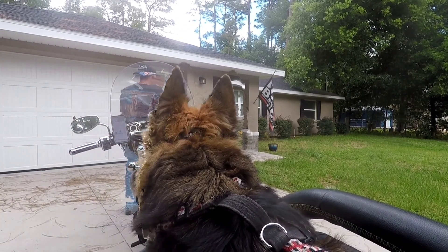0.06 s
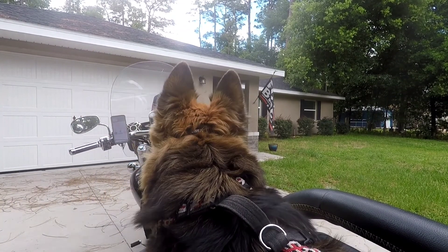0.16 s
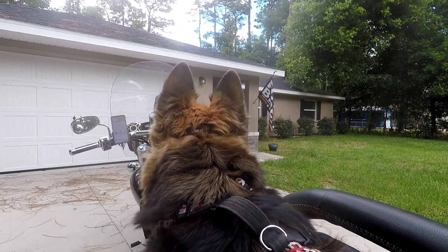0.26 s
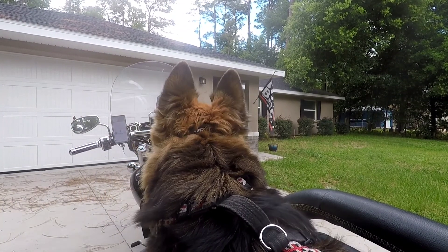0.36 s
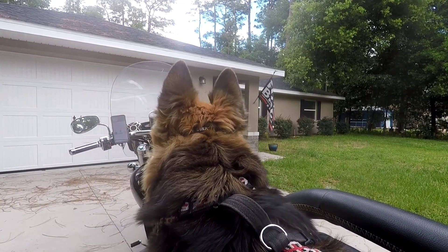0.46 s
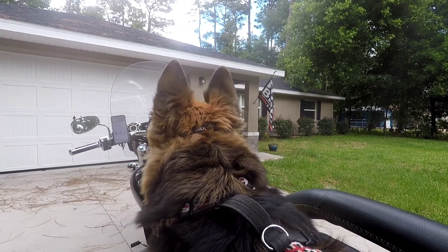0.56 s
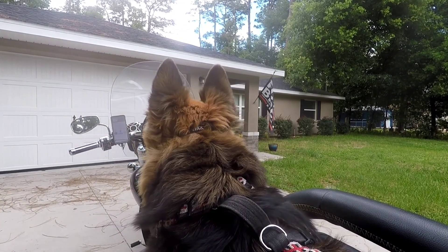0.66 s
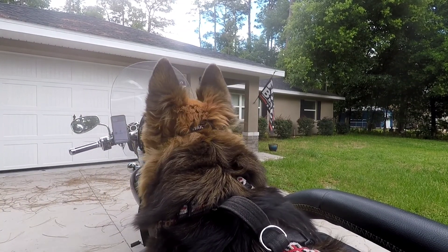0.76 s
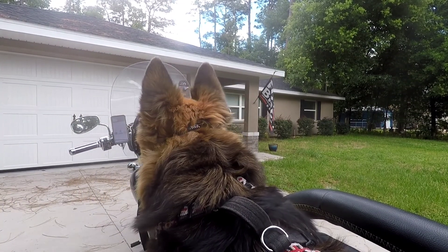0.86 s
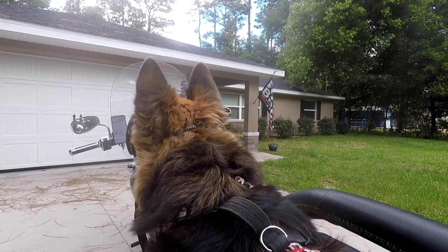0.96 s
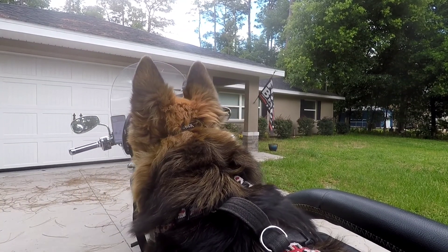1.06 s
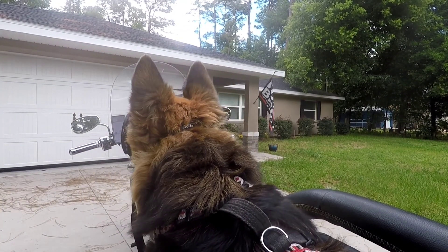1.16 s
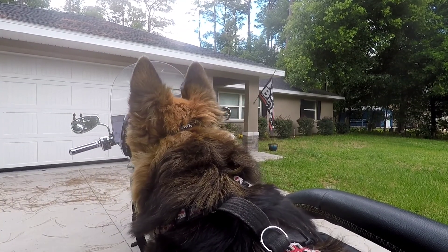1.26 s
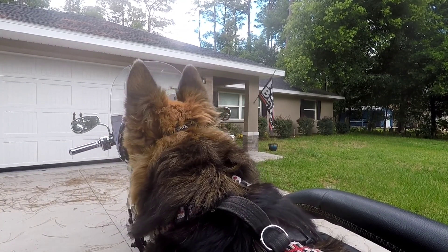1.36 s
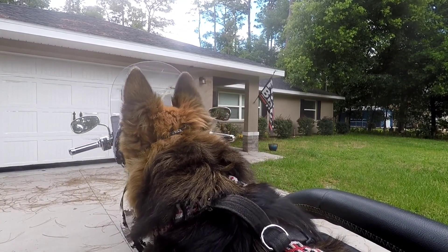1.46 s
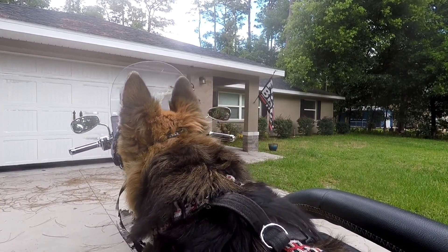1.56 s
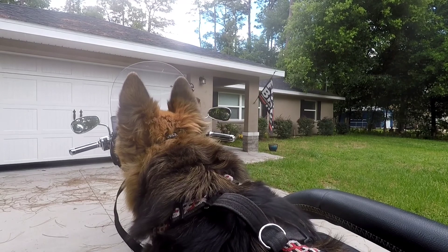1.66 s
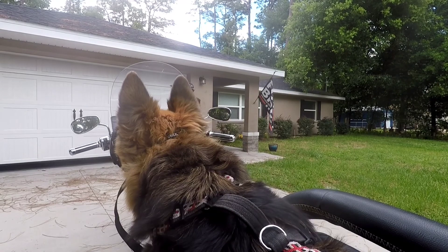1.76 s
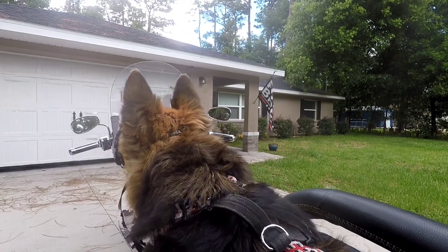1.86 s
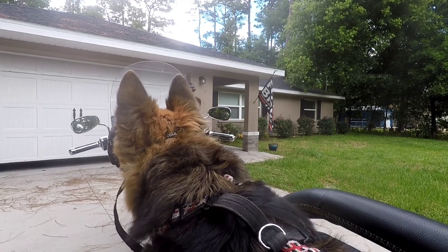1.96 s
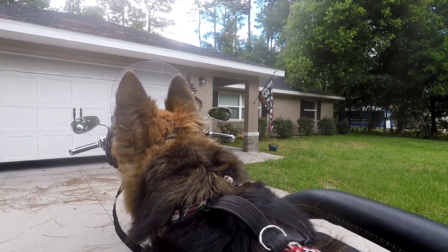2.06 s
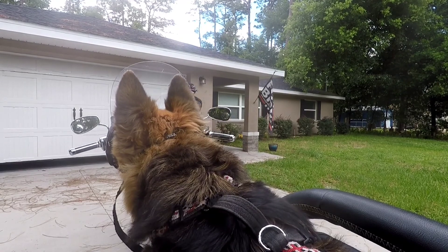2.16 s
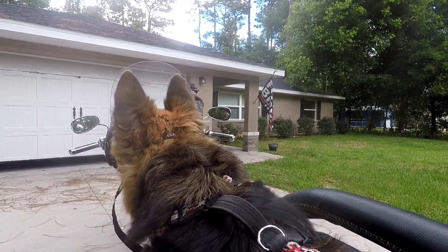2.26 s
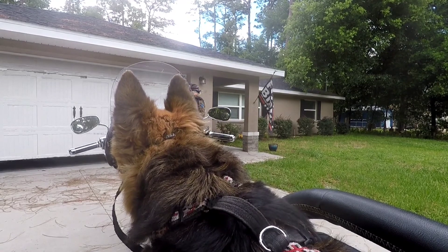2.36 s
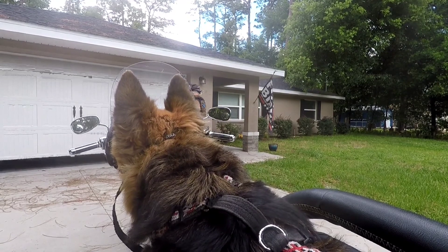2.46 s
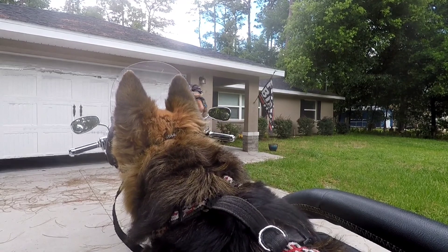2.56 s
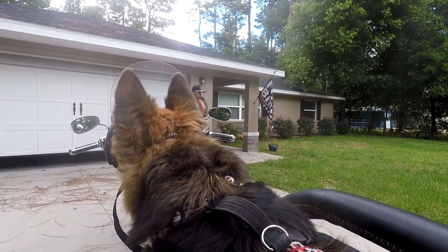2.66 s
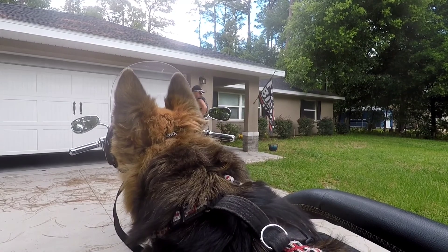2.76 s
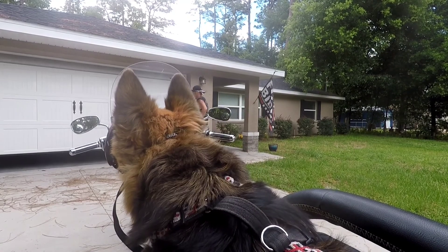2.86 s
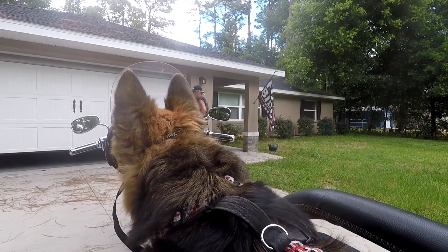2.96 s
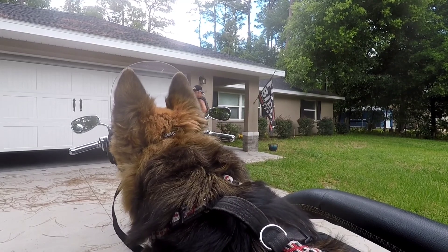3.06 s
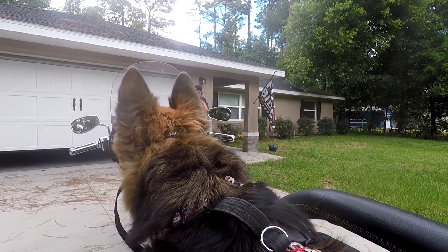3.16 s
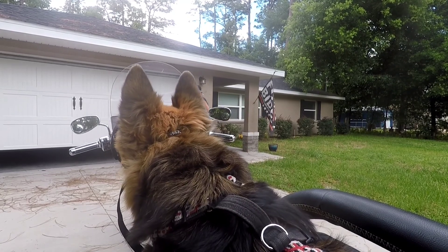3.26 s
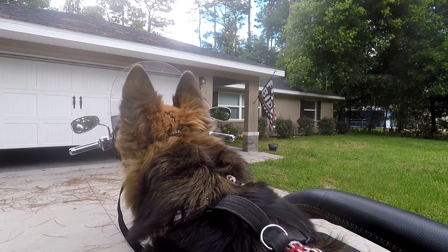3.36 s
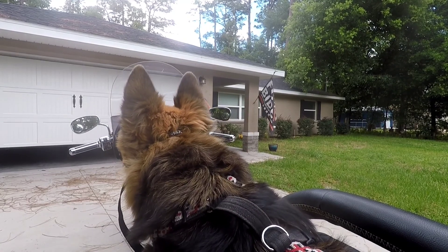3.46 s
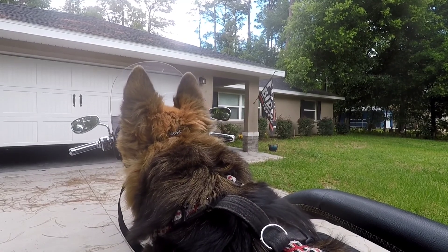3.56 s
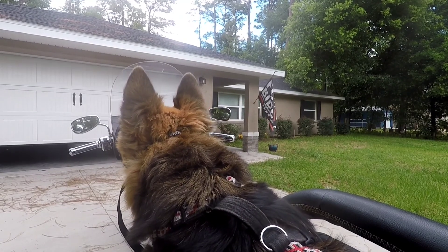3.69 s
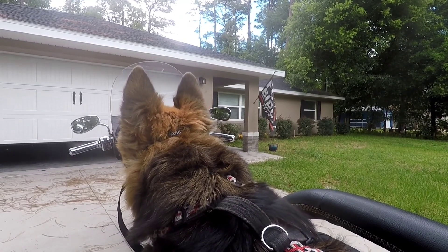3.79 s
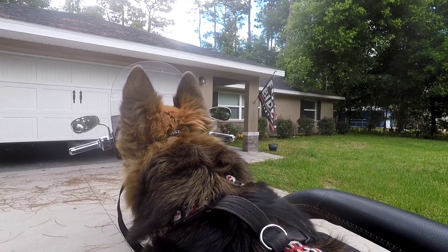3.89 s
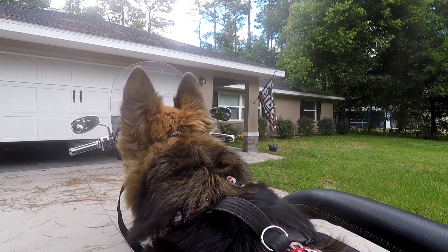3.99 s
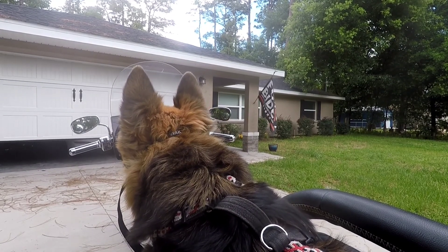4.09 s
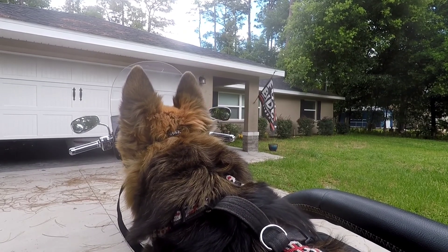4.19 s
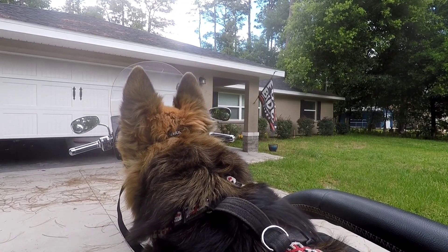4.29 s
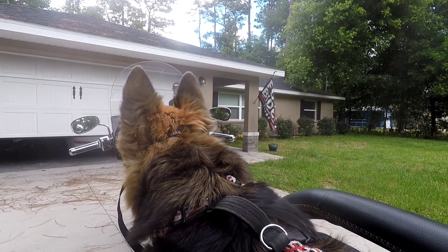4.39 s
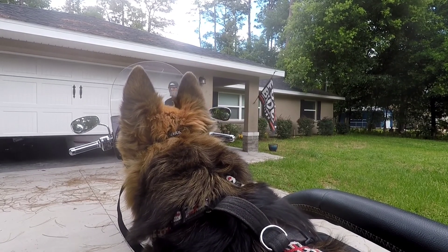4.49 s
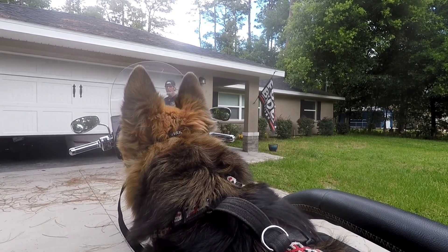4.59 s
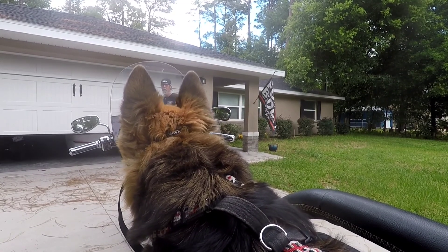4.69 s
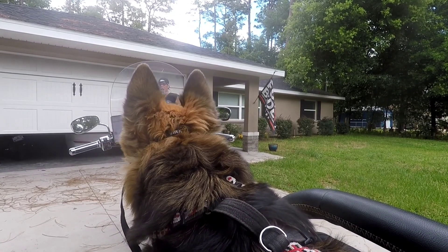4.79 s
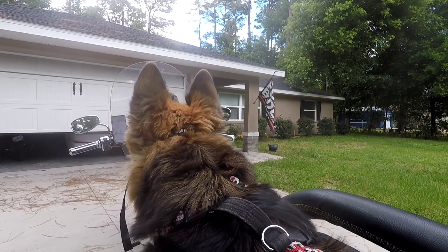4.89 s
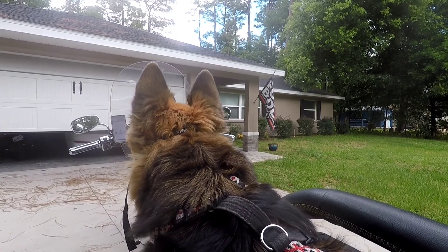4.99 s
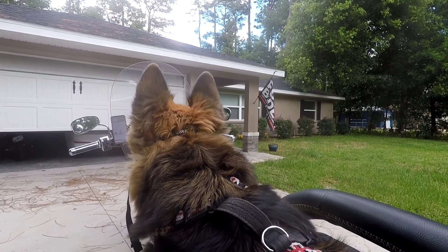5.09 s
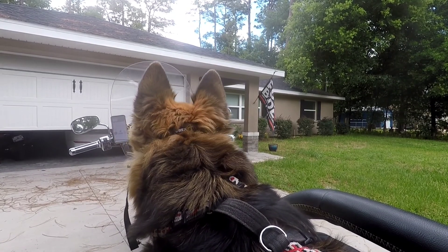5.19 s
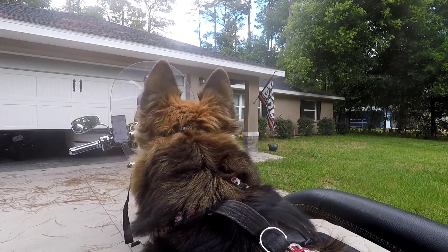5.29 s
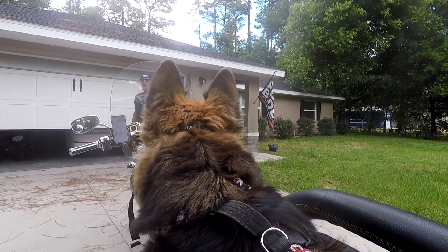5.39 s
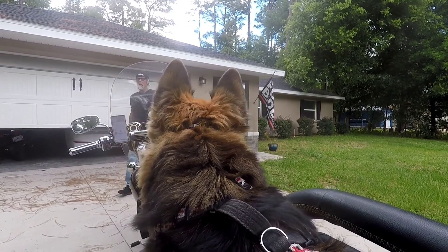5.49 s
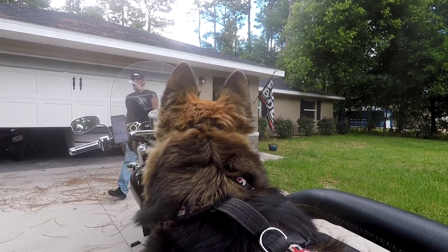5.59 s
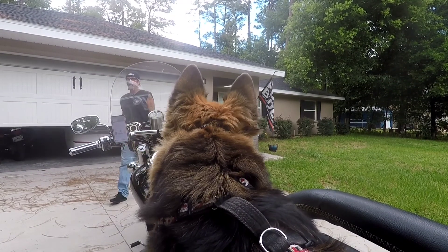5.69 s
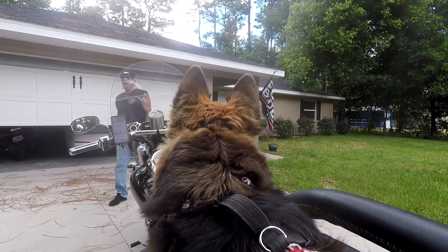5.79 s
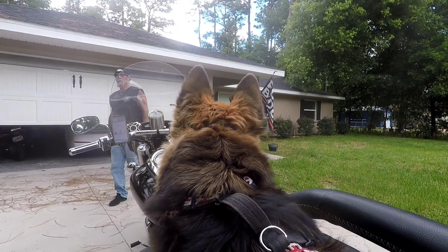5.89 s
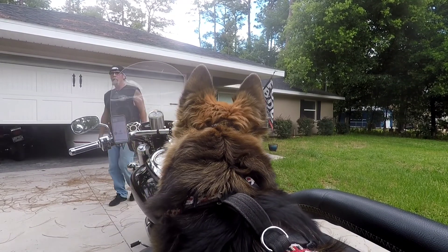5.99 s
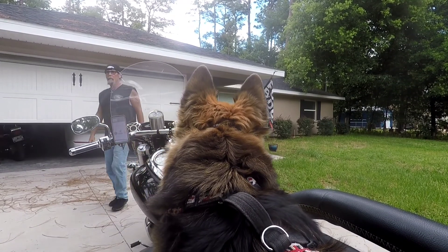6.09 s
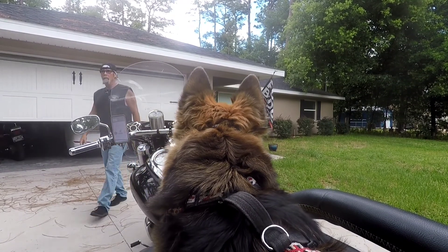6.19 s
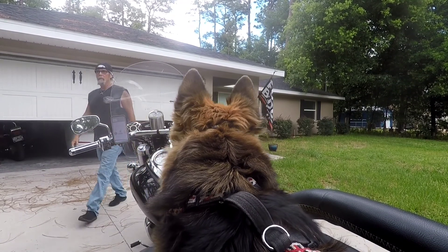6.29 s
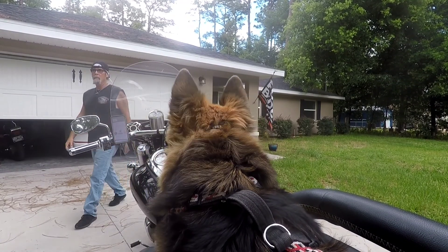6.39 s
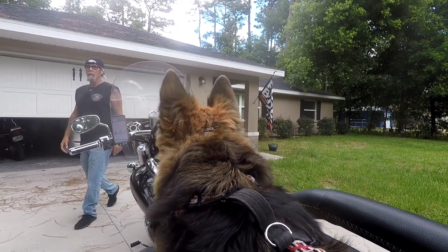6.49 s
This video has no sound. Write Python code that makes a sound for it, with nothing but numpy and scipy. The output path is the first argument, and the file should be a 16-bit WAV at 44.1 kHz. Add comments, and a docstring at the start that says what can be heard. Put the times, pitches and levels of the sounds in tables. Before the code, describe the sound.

A sectional steel garage door being raised by a motor, heard from a driveway. Faint garden hiss and soft knocks come first, then a deep panel rumble sets in. Sharp, gritty spring ticks begin and become regular, over rushing rollers and a droning frame. A heavy low jolt passes midway. Close stereo microphone in a small housing, rumble-heavy, with softened extreme treble.

```python
"""Driveway before a garage: a motor hauls up a sectional steel door.
The panels boom and the frame drones: noise shaped by spectra and by resonant modes.
Rollers rush in their tracks as coloured noise; the torsion spring ticks as its coils slip,
each slip driving a bank of modes. Knocks, pings and a squeak join in; a quiet garden hisses below.
Two close microphone ports colour left and right differently."""
import sys
import numpy as np
from scipy import signal
from scipy.fft import rfft, irfft
from scipy.io import wavfile

SR = 44100
rng = np.random.default_rng(int(sys.argv[2]) if len(sys.argv) > 2 else 0)


def to_wav(sig):
    """Store sig (one row per channel, or 1-D mono) as 16-bit WAV at the path in sys.argv[1].

    Samples outside -1..1 are clipped; the rate is SR.
    """
    pcm = np.clip(np.atleast_2d(sig), -1, 1) * 32767
    pcm = np.round(pcm).astype(np.int16)
    wavfile.write(sys.argv[1], SR, pcm.T)  # frames by channels


N = 288640
HZ = np.maximum(np.fft.rfftfreq(N, 1 / SR), 1)   # the FFT grid, kept above zero for logarithms
MOVES_S, FULL_SPEED_S = 1.13, 2.4   # the door gathers speed between these moments

# One section jolts over the bend: start in seconds, starting pitch in Hz, level in dB before the
# rise and decay, rise time constant in seconds, time to fall 60 dB in seconds.
JOLT = (2.735, 27, -10, .03, .7)


def from_db(db):
    """Decibel law: the amplitude gain of a level."""
    return 10 ** (np.asarray(db) / 20)


def rms_one(x):
    """Power normalisation: scales a signal to rms 1."""
    return x / np.sqrt(np.mean(x ** 2) + 1e-20)


def in_time(rows):
    """Linear interpolation: the columns of a curve at every sample."""
    s, *columns = np.transpose(rows)
    return [np.interp(np.arange(N) / SR, s, c) for c in columns]


def at_hz(points, column=1):
    """Interpolation over log frequency: a column of a spectrum table on the FFT grid."""
    table = np.transpose(points)
    return np.interp(np.log(HZ), np.log(table[0]), table[column])


def ramp(start_s, end_s):
    """Linear growth from 0 to 1 between two moments, held on either side."""
    return np.clip((np.arange(N) / SR - start_s) / (end_s - start_s), 0, 1)


def drift(rate_hz):
    """Low-passed noise: a slow random wander of rms 1 with the given corner rate."""
    knots_per_s = 40
    knots = rng.standard_normal(int(N / SR * knots_per_s) + 2)
    smooth = signal.lfilter([1], [1, -np.exp(-2 * np.pi * rate_hz / knots_per_s)], knots)
    return np.interp(np.arange(N) / SR * knots_per_s, np.arange(len(knots)), rms_one(smooth))


def coloured(spectrum):
    """Spectral shaping: white noise weighted by a spectrum, silent outside it; rms 1."""
    inside = (HZ >= spectrum[0][0]) & (HZ <= spectrum[-1][0])
    white = rfft(rng.standard_normal(N))
    return rms_one(irfft(white * from_db(at_hz(spectrum)) * inside, N))


def resonate(x, hz, width):
    """Damped oscillator: one two-pole resonance, gain 1 near its top, decay set by its width in Hz."""
    r = np.exp(-np.pi * width / SR)
    feed = np.array([1, 0, -1]) * (1 - r * r) / 2
    return signal.lfilter(feed, [1, -2 * r * np.cos(2 * np.pi * hz / SR), r * r], x)


def narrow(hz, width):
    """Randomly driven mode: steady noise twice through one resonance; rms 1."""
    return rms_one(resonate(resonate(rng.standard_normal(N), hz, width), hz, width))


def panels():
    """Plate vibration: a broad boom plus panel modes, each wavering in level on its own."""
    # Each row: frequency in Hz, density in dB per Hz.
    boom_spectrum = [(26, -49), (45, -1.5), (81, -2), (114, 1), (188, -7.5), (231, -12.5), (270, -20),
                     (350, -21.5), (590, -120)]
    # Panel modes, the three lowest first. Each row: frequency in Hz, resonance width in Hz,
    # relative level in dB.
    panel_modes = [(75.65, 6.65, 1), (105.5, 10, -2.5), (121.2, 6.3, -8.5), (157, 14.7, -8),
                   (198.7, 7.3, -11.5), (231.8, 14.16, -11)]
    # The low panel modes waver in level, each on its own. Each row: time in seconds, then the levels
    # in dB of the three lowest modes, of which a share of the departure from the mean is heard.
    low_modes = [(1.2, -29.5, -32, -31), (2.17, -25.5, -36, -35), (2.34, -19, -32, -31),
                 (2.97, -38, -29, -35), (3.52, -24, -35, -37), (3.69, -24, -19.5, -23),
                 (3.84, -37, -31, -37), (4.05, -9, -30, -30), (4.12, -35, -44, -43),
                 (4.27, -17.5, -25, -34), (5.38, -25, -24, -32), (5.48, -20.5, -36, -16),
                 (6.01, -20, -26, -32.5), (6.5, -33, -39, -22)]
    # The motor takes up the load. Each row: time in seconds, level in dB of the large sections,
    # level in dB of the small ones.
    boom_level = [(0.0, -52, -44.5), (0.35, -55, -39), (0.49, -31, -35), (1.07, -30, -38.5),
                  (1.11, -17.5, -47.5), (1.15, -23.5, -29.5), (2.75, -20, -25), (2.99, -20, -30),
                  (3.32, -22, -26.5), (3.66, -18, -27), (3.81, -19.5, -25), (5.98, -21.5, -32),
                  (6.55, -18, -26)]
    split_hz = 135   # large sections below, small ones above
    waver_share, drift_db, modes_db = .35, 1, 1
    wavers = [waver_share * (db - db.mean()) for db in in_time(low_modes)]
    wavers += [drift_db * drift(0.58) for mode in panel_modes[3:]]   # the upper modes drift at random
    modes = sum(from_db(db + waver) * narrow(hz, width)
                for (hz, width, db), waver in zip(panel_modes, wavers))
    boom = rfft(coloured(boom_spectrum) + from_db(modes_db) * rms_one(modes))
    large = rms_one(irfft(boom * (HZ < split_hz), N))
    small = rms_one(irfft(boom * (HZ >= split_hz), N))
    large_db, small_db = in_time(boom_level)
    return from_db(large_db) * large + from_db(small_db) * small


def shudder():
    """Low-frequency forced vibration: builds up at the start and swells while a section jolts."""
    # Each row: frequency in Hz, density in dB per Hz.
    shudder_spectrum = [(8.8, -39), (15, 1.5), (48, -7), (55, 4), (72, -20), (120, -120)]
    full_db, rise_db, full_s = -26, 44, 1
    swell_db, hold_s, edge_s = 14, 0.198, 0.018
    s = JOLT[0]
    swell = ramp(s, s + edge_s) - ramp(s + hold_s, s + hold_s + edge_s)
    missing_db = rise_db * (1 - ramp(0, full_s)) ** 2
    return from_db(full_db - missing_db + swell_db * swell) * coloured(shudder_spectrum)


def jolt():
    """Transient oscillation: the whole door swings at a low, rising pitch and settles."""
    s, hz, db, rise, t60 = JOLT
    t = np.maximum(np.arange(N) / SR - s, 0)
    envelope = from_db(db - 60 * t / t60) * (1 - np.exp(-t / rise))
    return envelope * np.sin(2 * np.pi * hz * t * (1 + 0.45 * t))


def drone():
    """Structure-borne sound: broad frame noise plus modes, each growling at its own pace."""
    # Each row: frequency in Hz, density in dB per Hz.
    drone_spectrum = [(150, -18), (250, 0), (301, -3), (425, -3), (514, -7.5), (688, -22), (800, -24),
                      (1040, -31), (1760, -120)]
    # Frame modes. Each row: frequency in Hz, resonance width in Hz, relative level in dB.
    growl = [(288, 37, 0), (351.2, 26, -0.5), (411.2, 33, 0), (458.4, 32.4, 0), (526, 29.6, -3.5),
             (586.7, 43, -6.5)]
    # Each row: time in seconds, level of the drone in dB.
    drone_level = [(0.0, -53.5), (0.49, -42), (0.54, -40), (1.11, -44), (1.15, -38), (2.79, -33),
                   (4.43, -32.5), (4.59, -35.5), (5.76, -32), (6.55, -33.5)]
    growl_db, waver_db = -2, 2.6
    modes = sum(from_db(db + waver_db * drift(3.0)) * narrow(hz, width) for hz, width, db in growl)
    body = rms_one(coloured(drone_spectrum) + from_db(growl_db) * rms_one(modes))
    return from_db(in_time(drone_level)[0] + 1.07 * drift(3.7)) * body


def frame_hum():
    """Modal resonance: one wavering mode of the frame hums once it is loaded."""
    from_s = 0.18
    return from_db(-55 + 2.7 * drift(8.4)) * ramp(from_s - .05, from_s) * narrow(572, 78)


def hollow():
    """Cavity-like resonance: the wavering hollow band of the frame."""
    # Each row: time in seconds, level in dB.
    hollow_level = [(1.1, -60), (2.5, -58), (2.9, -39.5), (3.15, -41), (3.5, -50), (4.2, -42), (4.8, -46),
                    (5.3, -40.5), (6.0, -42), (6.55, -40.5)]
    return from_db(in_time(hollow_level)[0] + 2.0 * drift(3.7)) * narrow(440, 200)


def inside_garage():
    """Room resonance: wavering bands of the garage interior, heard once the gap is wide."""
    # Each row: frequency in Hz, resonance width in Hz, level in dB.
    room_modes = [(1364, 150, -56), (1633, 120, -57), (2333, 220, -59), (2697, 85, -59)]
    bands = sum(from_db(db + 3 * drift(5.0)) * narrow(hz, width) for hz, width, db in room_modes)
    return ramp(4.96, 5) * bands


def rollers(speed):
    """Rolling noise: a broad rush and a ringing track that flicker together."""
    # Each row: frequency in Hz, density in dB per Hz.
    rush_spectrum = [(410, -8), (700, 0.5), (1040, -2), (1770, 0), (2140, -5.5), (2340, -4.5), (2860, -8.5),
                     (3300, -8.5), (4290, -16.5), (7260, -120)]
    # The rush grows as the gap under the door opens. Each row: time in seconds, level in dB.
    rush_level = [(0.0, -58), (0.42, -55), (1.02, -56), (1.42, -51), (2.6, -45.5), (2.68, -46), (3.9, -48),
                  (4.19, -46.5), (4.68, -48.5), (5.23, -45), (6.44, -43.5), (6.55, -43)]
    track_db, track_rise_db, waver_db = -57, 2.5, 1.5   # at full speed; gain since it began to move
    peak_db, peak_s, peak_width_s = 8, 2.7, 0.32   # strongest soon after full speed
    late_db, late_s = 5, 6.4   # it rings again when the door is high
    peak = np.exp(-((np.arange(N) / SR - peak_s) / peak_width_s) ** 2)
    level_db = track_db - track_rise_db * (1 - speed) + peak_db * peak
    level_db += late_db * ramp(late_s, late_s + .2) + waver_db * drift(9.5)
    track = from_db(level_db) * ramp(MOVES_S - .05, MOVES_S) * narrow(1781, 260)
    rush = from_db(in_time(rush_level)[0]) * coloured(rush_spectrum)
    return from_db(1.6 * drift(3.6)) * (rush + track)


def sizzle(speed):
    """High-frequency friction noise: grows with speed and flickers."""
    # Each row: frequency in Hz, density in dB per Hz.
    sizzle_spectrum = [(1760, -62.5), (3000, -22), (3530, -4), (4170, -4.5), (4650, -3), (5210, -3.5),
                       (5840, -1.5), (6870, 4.5), (8460, -6.5), (9950, -14), (11300, -10), (12600, -37),
                       (13400, -30), (14100, -58), (15000, -78)]
    full_db, rise_db, flicker_db = -49.5, 10.5, 2
    level_db = full_db - rise_db * (1 - speed) + flicker_db * drift(14)
    return from_db(level_db) * coloured(sizzle_spectrum)


def slip(after):
    """Impulsive force: one catch of the coils, with a quick rise and a quick fall."""
    after = np.maximum(after, 0) / .0062   # in time constants
    return after * np.exp(1 - after) ** 2


def spring():
    """Stick-slip: a gritty snap, then a chattering rattle, excite modes of varied strength and tuning."""
    # Spring ticks and fainter catches. Each row: time in seconds, drive of the main modes in dB, main
    # pitch in Hz, drives of the low, middle, upper and top modes in dB, rattle against snap in dB.
    ticks = [(1.7081, -38, 6750, -40, -35, -61, -60, 1.5), (1.9428, -29.5, 7400, -43, -33, -48, -48, 1.5),
             (2.1312, -27, 6780, -40, -36, -51, -55, 3.5), (2.3543, -35, 6700, -34, -32, -54, -45, -6),
             (2.3917, -37, 6660, -53, -53, -54, -64, -6), (2.5052, -25.5, 6980, -39, -32.5, -49, -52, 5.5),
             (2.5627, -40, 6670, -51, -50, -54, -59, -1), (2.649, -28.5, 6940, -38.5, -35.5, -50, -52, 5),
             (2.7234, -40, 7100, -43.5, -47, -58, -69, -1), (2.8296, -22, 6940, -39, -31.5, -49, -48, 0),
             (2.9492, -42, 6700, -48, -43, -60, -53, -6), (3.045, -21.5, 6970, -48, -35, -44, -45, -3),
             (3.1872, -55, 6970, -63, -63, -60, -68, -10), (3.26, -26, 6860, -51, -37, -45, -45, 0),
             (3.4047, -44, 6950, -53, -60, -62, -72, -5), (3.5044, -27.5, 6800, -44, -38, -50, -58, 5),
             (3.6314, -33, 7170, -45, -42, -50, -60, 7.5), (3.7706, -25, 6730, -45, -40, -45, -50, 4.5),
             (3.8117, -35, 7400, -52, -44, -51, -59, 0), (3.928, -30.5, 6760, -45, -40, -46, -56, 8.5),
             (4.0921, -26, 6800, -41, -34.5, -42, -50, 3.5), (4.2589, -27.5, 6770, -37, -37.5, -50, -50, 6),
             (4.3944, -32.5, 6680, -45.5, -40.5, -49, -56, 5.5),
             (4.5407, -17.5, 6700, -34, -30.5, -39.5, -49, 1),
             (4.6704, -26.5, 6740, -44, -37, -51, -58, 3.5), (4.8073, -20, 6900, -36, -33.5, -44, -47, 0.5),
             (4.941, -22, 6800, -37.5, -36, -47, -49, -3), (5.0504, -22.5, 6750, -38, -35.5, -52, -57, -1),
             (5.155, -21, 6970, -39, -34, -52, -61, -4), (5.2619, -23.5, 6800, -40, -36, -48, -48, -4),
             (5.3943, -31.5, 6750, -38, -40, -54, -58, 1.5), (5.5234, -19.5, 6880, -39, -32, -53, -56, -2),
             (5.6306, -26, 6960, -39, -40, -57, -62, 1), (5.7314, -20, 6830, -36, -35, -51, -57, -1),
             (5.8755, -24, 6800, -38.5, -41, -61, -61, 1), (5.976, -24, 6840, -47, -41.5, -50, -52, 6),
             (6.0561, -29, 6970, -44, -44, -51, -57, 3.5), (6.1275, -35, 6700, -46, -50, -57, -62, 5),
             (6.1915, -33.5, 7000, -47, -47, -55, -64, 7.5), (6.327, -32.5, 7140, -54, -48, -51, -62, 3),
             (6.368, -38, 6690, -55, -47, -57, -67, -3), (6.4054, -44, 6750, -52, -54, -57, -76, -2),
             (6.4737, -33, 6750, -47, -54, -58, -73, -2)]
    # Spring and bracket modes. Each row: frequency in Hz, resonance width in Hz, relative level in dB.
    spring_modes = [(1795, 300, 4.5), (3540, 270, 5), (4006, 90, 0.5), (4610, 120, 1.5), (4835, 250, 1),
                    (5680, 730, -1.5), (6697, 180, -0.5), (6850, 260, 1), (7340, 470, -2), (8400, 900, -3),
                    (9600, 1400, 6.5), (12700, 1200, 8)]
    # For each mode, the drive it takes: 0 main, 1 low, 2 middle, 3 upper, 4 top.
    groups = [1, 1, 1, 2, 2, 2, 0, 0, 0, 3, 3, 4]
    moving_mode = 7   # takes the main pitch of each tick
    strength_spread_db, detune = 1.5, .008   # each slip finds the coils a little differently loaded
    main_lag_s, stagger_s = .002, .0015   # main modes answer late; modes do not answer all at once
    contact_db, grit_db = .16, 2.5   # uneven contacts felt by all modes at once; by each mode alone
    t60_s, high_lasts = .29, 1.4   # the high modes rattle longer
    high_snap_db, main_rattle_db = -5, -4.5   # high modes snap less, main modes rattle less
    chatter_per_s, chatter_db = 350, 15   # separate touches of coil on coil
    rebound_db, broad_db = -16, -9
    t = np.arange(-1500, 13500) / SR
    after, out = np.maximum(t, 0), np.zeros(N + len(t))
    # a faint noise swells for a few milliseconds before each snap
    lead_in = from_db(-4) * np.exp(np.minimum(t, 0) / .0035) * (t < 0)
    onset = 1 - np.exp(-after / 0.0027)
    broad = signal.butter(2, [1200, 9000], "band", fs=SR, output="sos")
    chance = rng.standard_normal((len(ticks), 3, len(spring_modes)))
    for (s, main_db, pitch_hz, *others_db, rattle_db), (own, tuning, timing) in zip(ticks, chance):
        levels_db = [main_db, *others_db]
        contact = from_db(contact_db * rng.standard_normal(50).repeat(300))
        touched = rng.random(len(t)) < chatter_per_s / SR
        touches = from_db(chatter_db) * touched * rng.standard_normal(len(t))
        # two faint catches follow each slip at uneven gaps
        rebounds = sum(rng.random() * 2 * slip(t - late) for late in rng.uniform(.012, .05, size=2))
        snap = slip(t) + from_db(rebound_db) * rebounds
        tick = 0
        for k, ((hz, width, db), group) in enumerate(zip(spring_modes, groups)):
            main, high = group == 0, group >= 3
            fall_db = 60 * after / (t60_s * (high_lasts if high else 1))
            rattle = from_db(rattle_db + main_rattle_db * main - fall_db) * onset
            shape = lead_in + from_db(high_snap_db * high) * snap + rattle
            force = from_db(levels_db[group] + strength_spread_db * own[k]) * contact * shape
            grit = from_db(grit_db * rng.standard_normal(75).repeat(200)) * rng.standard_normal(len(t))
            hz = pitch_hz if k == moving_mode else hz * (1 + detune * tuning[k])
            rung = resonate(resonate(force * (grit + touches), hz, width), hz, 2 * width)
            even = np.sqrt(SR / (np.pi * width))   # offsets the power lost in a narrow mode
            lag_s = main_lag_s * main + stagger_s * timing[k]
            tick = tick + from_db(db - 16.5) * even * np.roll(rung, round(lag_s * SR))
        # a broad noise follows the middle modes' drive and the rattle of the last mode
        dull = from_db(levels_db[2] + broad_db) * contact * (lead_in + snap + rattle)
        tick = tick + signal.sosfilt(broad, dull * rng.standard_normal(len(t)))
        out[round((s - .0045 + t[0]) * SR):][:len(t)] += tick   # slips 4.5 ms ahead of the listed time
    return out[:N]


def rings(table, rise, width, rough, sag=0, bounce=0):
    """Free vibration: tones roughened by narrow noise start softly, hold, then stop; may sag and throb."""
    out, t = np.zeros(N + SR), np.arange(int(.3 * SR)) / SR
    throb = 1 - bounce * np.sin(np.pi * 38 * t - .6) ** 2   # 38 bounces per second
    for s, hz, db, t60 in table:
        scuff = rms_one(resonate(resonate(rng.standard_normal(len(t)), hz, width), hz, width))
        tone = np.sin(2 * np.pi * (hz * t * (1 - sag * t / 2) + rng.random())) + rough * scuff
        envelope = from_db(db - 60 * (t / t60) ** 2) * (1 - np.exp(-t / rise))
        out[round(s * SR):][:len(t)] += envelope * throb * tone
    return out[:N]


def pings():
    """Amplitude-modulated ringing: a loose bracket bounces while its pitch sags."""
    # Each row: start in seconds, starting pitch in Hz, level in dB before the envelope,
    # time to fall 60 dB in seconds.
    bracket_pings = [(1.118, 4900, -52, .08), (1.328, 4880, -46, .11), (1.563, 4880, -46, .08),
                     (1.578, 3600, -48, .04), (1.61, 3600, -46, .04), (1.708, 4810, -40, .19),
                     (1.943, 7500, -43, .07), (2.13, 4900, -40, .08), (2.298, 4850, -41, .06),
                     (2.315, 4000, -47, .08), (2.322, 3460, -45, .035), (2.356, 4680, -37, .06),
                     (2.392, 3520, -45, .035), (2.44, 3510, -45, .035), (2.52, 3640, -43, .05),
                     (2.74, 4850, -45, .08), (3.047, 3500, -39, .04), (3.257, 4560, -36, .05),
                     (3.29, 4640, -41, .1), (3.5, 3460, -43, .08), (3.535, 3460, -41, .11),
                     (3.54, 4600, -46, .06), (4.537, 3600, -34, .045)]
    return rings(bracket_pings, rise=0.00134, width=400, rough=.4, sag=.12, bounce=.6)   # sag: share per s


def frame_rings():
    """Free vibration: the hollow frame rings as the load comes on."""
    # Each row: start in seconds, pitch in Hz, level in dB before the envelope,
    # time to fall 60 dB in seconds.
    ring_table = [(.17, 460, -38, .07), (.541, 563, -32, .11), (.55, 400, -37, .1), (.601, 554, -35, .07),
                  (.799, 581, -40, .07)]
    return rings(ring_table, rise=.005, width=180, rough=.8)


def knocks():
    """Impact noise: faint dull bursts die away as the door takes the load."""
    # Each row: start in seconds, level in dB before the filter and envelope, upper band edge in Hz,
    # time to fall 60 dB in seconds.
    knock_table = [(0.164, -49, 2500, 0.15), (0.461, -44, 7000, 0.067), (0.545, -42, 1900, 0.25),
                   (1.114, -44, 2980, 0.147), (1.33, -48, 8000, 0.205)]
    out, t = np.zeros(N), np.arange(int(.3 * SR)) / SR
    for s, db, hz, t60 in knock_table:
        envelope = from_db(db - 60 * t / t60) * (1 - np.exp(-t / 0.0018))
        burst = envelope * rng.standard_normal(len(t))
        band = signal.butter(3, [700, hz], "band", fs=SR, output="sos")
        out[round(s * SR):][:len(t)] += signal.sosfilt(band, burst)
    return out


def squeak():
    """Frequency modulation: a roller squeaks as one sine whose pitch ends in a fall, with soft ends."""
    # Each row: time in seconds, pitch in Hz, rms level in dB before the soft ends.
    squeak_path = [(4.985, 7900, -50), (5.0, 7900, -50), (5.02, 7940, -48.5), (5.04, 7550, -42),
                   (5.056, 7000, -44)]
    hz, db = in_time(squeak_path)
    t = np.arange(N) / SR
    ends = np.clip(np.minimum(t - squeak_path[0][0], squeak_path[-1][0] - t) / .008, 0, 1)
    return np.sqrt(2) * from_db(db) * ends * np.sin(2 * np.pi * np.cumsum(hz) / SR)


def singing(speed):
    """Sustained modal excitation: the moving door keeps bracket modes singing, each wavering."""
    # Each row: frequency in Hz, resonance width in Hz, level in dB at full speed.
    bracket_modes = [(3589, 110, -66), (4628, 120, -65), (6760, 110, -58)]
    return speed * sum(from_db(db + 4.5 * drift(7.0)) * narrow(hz, width)
                       for hz, width, db in bracket_modes)


def garden():
    """Stationary noise: the steady hiss of the garden."""
    # Each row: frequency in Hz, density in dB per Hz.
    garden_spectrum = [(410, -4.5), (700, -6.5), (1310, -6.5), (1780, -39), (2560, -16.5), (5170, -17.5),
                       (7700, -13.5), (12400, -15), (14100, -35), (15000, -54.5)]
    return from_db(-58) * coloured(garden_spectrum)


def ports(x):
    """Interchannel coherence: left is shaded and shifted against right; scatter has opposite signs."""
    # Each row: frequency in Hz, left against right in dB, phase lead of left in radians,
    # coherence from 0 to 1.
    port_table = [(30, -2.2, -.4, .98), (100, -5, -.35, .99), (200, -9.8, -.24, .93), (290, -14, 0, .78),
                  (345, -18.5, .8, .58), (410, -17, 1.9, .68), (480, -12.3, 2.4, .92), (620, -7, 2.75, .95),
                  (850, -4.5, 3.1, .75), (1100, 0, 1.8, .1), (1800, 5.5, 1.1, .55), (2600, 6, .4, .35),
                  (3800, 2.5, .2, .7), (5800, -3.5, .8, .35), (6700, -2, .07, .85), (11000, 1.5, 0, .4)]
    t = np.arange(SR // 4) / SR
    scatter = rng.standard_normal(len(t)) * np.exp(-t / .055)
    turn = rfft(scatter / np.sqrt(np.sum(scatter ** 2)), N)
    gain, alike = from_db(at_hz(port_table)), at_hz(port_table, column=3)
    direct = gain * np.sqrt(alike) * np.exp(1j * at_hz(port_table, column=2))
    loose = gain ** 2 * (1 - alike)
    both = np.abs(1 + direct) ** 2 + loose   # power of left plus right
    # the part of left minus right that follows the sum, then the part that does not
    tied = ((direct - 1) * np.conj(1 + direct) + loose) / both
    free = np.sqrt(np.maximum((np.abs(direct - 1) ** 2 + loose) / both - np.abs(tied) ** 2, 0))
    lead = 2000   # samples of room for the response ahead of time zero
    response = np.roll(irfft(tied + free * turn, N), lead)[:SR // 3]
    side = signal.fftconvolve(x, response)[lead:lead + N]
    return np.array([x + side, x - side])


def scene():
    """Superposition: door, spring and garden add before they reach the two ports."""
    speed = ramp(MOVES_S, FULL_SPEED_S)
    door = panels() + shudder() + jolt()
    door += drone() + frame_hum() + hollow() + inside_garage()
    door += rollers(speed) + sizzle(speed)
    metal = spring() + pings() + frame_rings() + knocks() + squeak() + singing(speed)
    return ports(door + metal + garden())


def record(dry):
    """Linear filtering: the microphone housing dips in the treble and rolls off above; the top is cut."""
    housed = dry - .8 * resonate(dry, 11200, 1300)
    housed = signal.sosfilt(signal.butter(8, 13700, fs=SR, output="sos"), housed)
    return signal.sosfilt(signal.cheby2(12, 70, 15100, fs=SR, output="sos"), housed)


dry = scene()
out = record(dry)
to_wav(out)
```